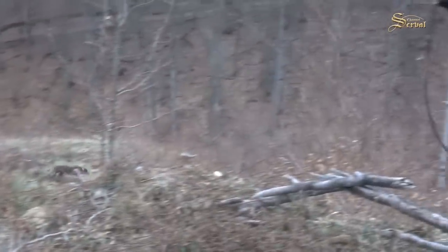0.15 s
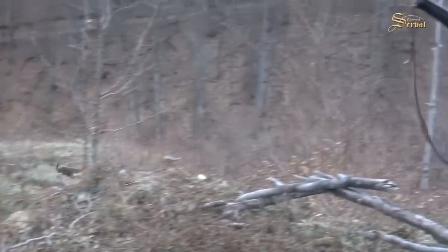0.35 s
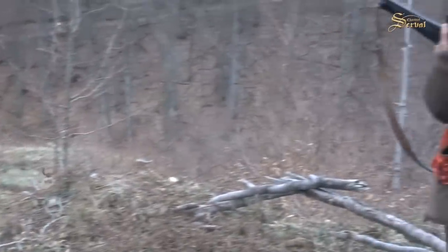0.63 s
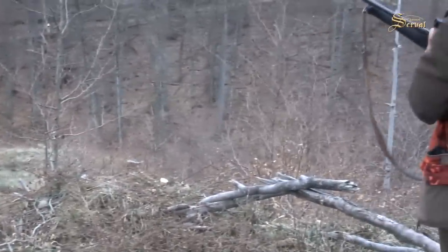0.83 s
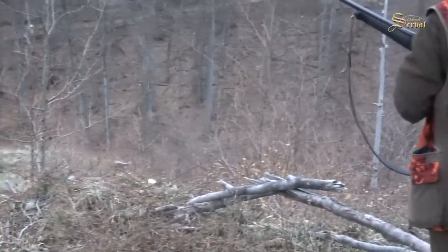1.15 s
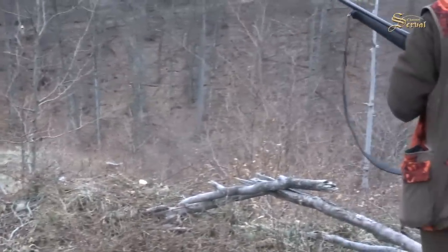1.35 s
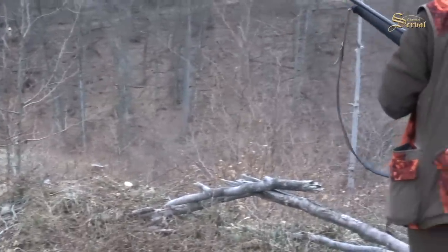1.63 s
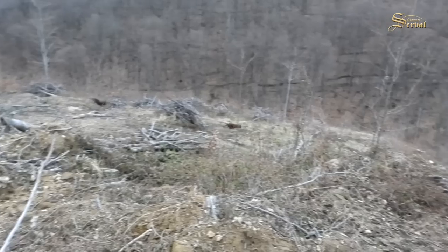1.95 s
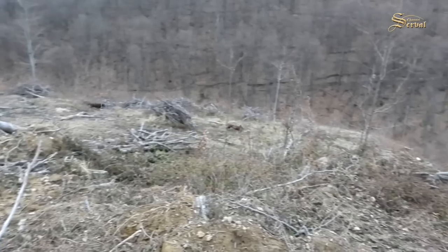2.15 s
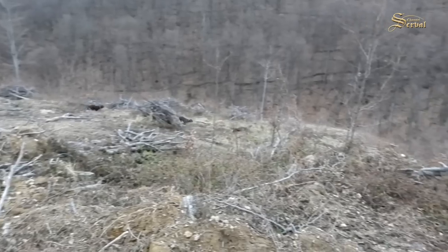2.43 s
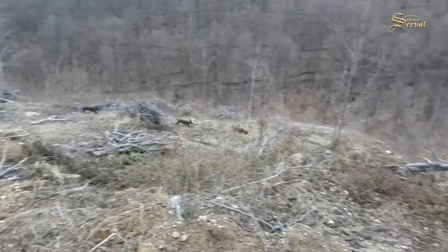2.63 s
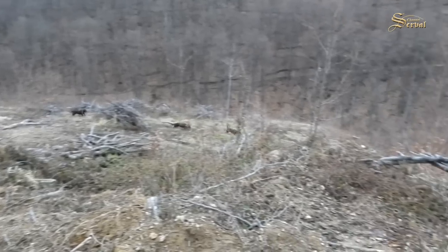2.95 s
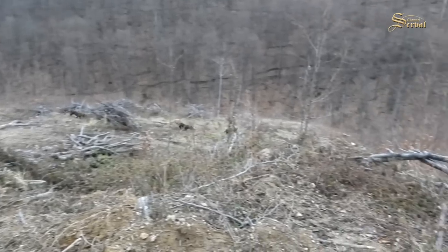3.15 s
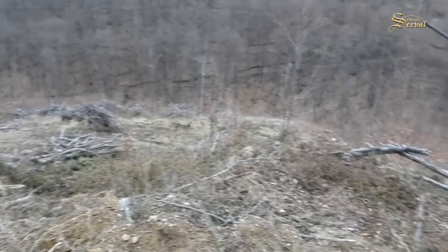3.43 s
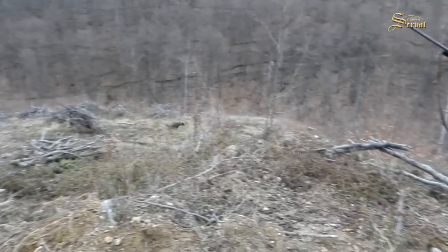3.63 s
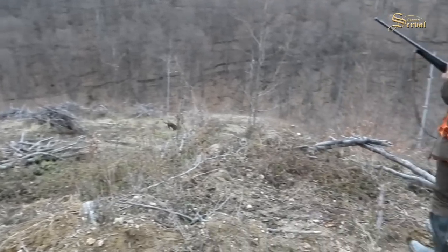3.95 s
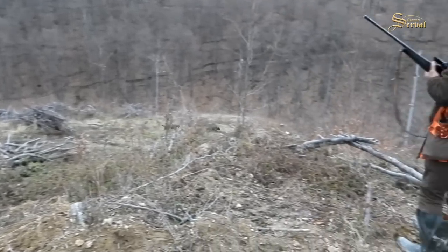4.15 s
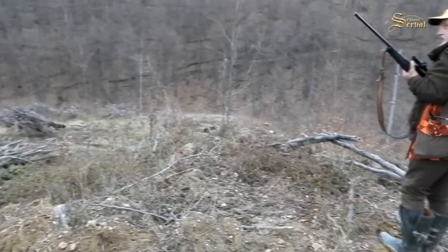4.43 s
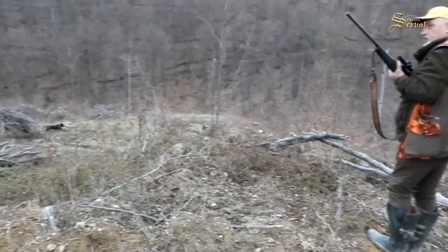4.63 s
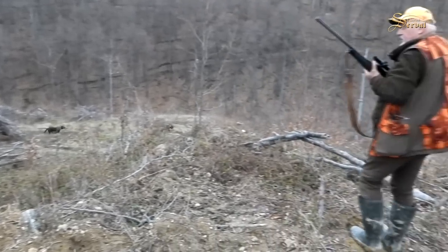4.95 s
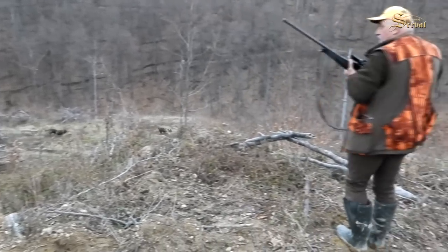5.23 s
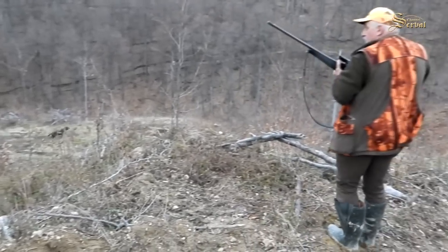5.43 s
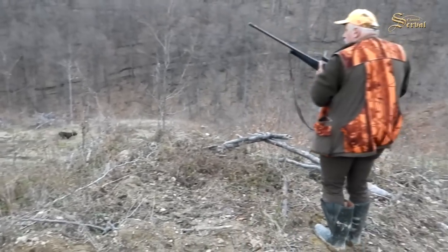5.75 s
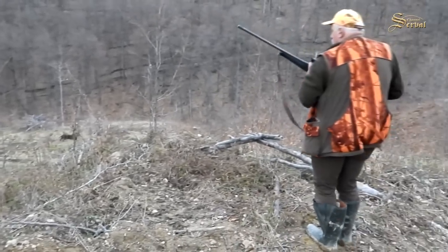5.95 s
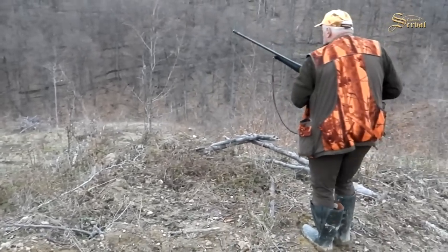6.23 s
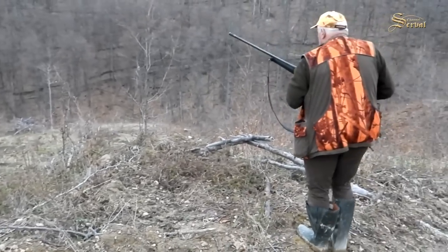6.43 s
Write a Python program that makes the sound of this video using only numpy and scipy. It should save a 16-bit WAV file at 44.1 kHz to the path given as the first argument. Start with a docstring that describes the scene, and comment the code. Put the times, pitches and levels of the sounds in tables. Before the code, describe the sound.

Hunting dogs give short, high-pitched yelps across a windy forest clearing, echoing off trees, with faint rustling, thin whistles and wind buffeting the microphone.

```python
"""Windy clearing ringed by forest; a pack of dogs yelps while running through brush.
From the start: pack yelps (partials plus breath noise), a far whistle, then a hound's falling yelp, repeated.
Throughout: thin whistles (dogs' noses, perhaps a bird: wavering sines) and twig snaps (noise bursts) among
the yelps; warbles near 0.9 s and at the end. Brush and trees scatter the yelps (sparse echoes).
Beneath: wind on two microphone ports, rumble and a faint rustling background (shaped noise)."""
import sys
import numpy as np
from scipy import signal
from scipy.fft import rfft, irfft
from scipy.io import wavfile
from scipy.ndimage import uniform_filter1d

SR = 44100
rng = np.random.default_rng(int(sys.argv[2]) if len(sys.argv) > 2 else 0)


def wrap_up_sound(samples):
    """Save the sound to the file named by the first command line argument, as 16-bit audio."""
    columns = np.atleast_2d(samples).T
    # keep every value between -1 and 1, then stretch to whole-number steps
    tamed = np.clip(columns, -1, 1)
    steps = np.round(tamed * 32767).astype(np.int16)
    wavfile.write(sys.argv[1], SR, steps)


N = 291060

# Pack yelps: (hoarseness, breath/dB, overtones/dB at start, middle, end, partial 3/dB, partial 4/dB,
# partials 5-9/dB), course [t/s, f/Hz, level/dB of partials 1-4 together]
PACK_YELPS = [ ((0.4, -19, -21.5, -23, -35, 21.5, 28, -50), [(0, 1825, -19.5), (.02, 1735, -20),
              (.045, 1424, -20), (.052, 1300, -53)]), ((0.06, 16.5, 5, 13.5, 3.5, -25, -25, -50),
              [(.004, 1074, -30.5), (.022, 1150, -30), (.055, 1146, -29), (.092, 1120, -39.5)]),
              ((.03, 1, -8, -20, -35, 4, 8, -38), [(.603, 777, -24), (.63, 1155, -22), (.66, 1382, -9),
              (.678, 1306, -5.5), (.69, 1290, -13), (.71, 1130, -14), (.736, 793, -22), (.752, 610, -34)]),
              ((.1, -5, -10, 3, 12, -30, -30, -42.5), [(.678, 777, -16), (.7, 761, -8.5), (.712, 700, -9),
              (.724, 640, -5), (.733, 560, -16)]), ((0.24, 6.5, -8, 2.5, -27, 10.5, 10.5, -50),
              [(1.328, 808, -39.5), (1.355, 1325, -14.5), (1.377, 1362, -16.5), (1.4, 1284, -12),
              (1.415, 1400, -32), (1.43, 1232, -10), (1.457, 1060, -34.5)]),
              ((0.04, -13, -29.5, -24.5, -20, 9, 14, -29.5), [(1.388, 771, -21), (1.41, 747, -6),
              (1.435, 679, -14), (1.452, 624, -21.5)]), ((.3, 2, 10, 14, 14, -11, -19, -50.5),
              [(1.425, 803, -21), (1.442, 804, -22.5), (1.46, 910, -16.5), (1.488, 886, -18.5),
              (1.493, 763, -17), (1.512, 703, -32.5)]), ((.02, 2, -10, -5, 10, 3, -10, -48),
              [(1.713, 1930, -24), (1.725, 1960, -15), (1.74, 2000, -19), (1.76, 2036, -32)]),
              ((.02, -9, -15, -25, -10, 0, 8, -50), [(1.778, 765, -36.5), (1.8, 1115, -17.5),
              (1.823, 1191, -8.5), (1.845, 1217, -10.5), (1.86, 1420, -28), (1.875, 1334, -15.5),
              (1.902, 868, -22)]), ((0.43, -7, -2, 9.5, 7.5, -10, -21.5, -59), [(1.83, 618.5, -25),
              (1.845, 597, -11), (1.86, 716.6, -11), (1.876, 653, -17), (1.892, 602, -14)]),
              ((0, -3, -4.5, 17, 24, -6, -23, -31.5), [(1.86, 688, -24.5), (1.875, 677, -12.5),
              (1.89, 827, -14.5), (1.907, 849, -12.5), (1.925, 873, -19.5), (1.932, 750, -8.5),
              (1.957, 599, -34)]), ((-0.8, 7, -5, -19, -15, 10, 8, -52), [(2.133, 1609, -19.5),
              (2.158, 1615, -31.5), (2.175, 1605, -28), (2.197, 1230, -37)]),
              ((0.04, -8.5, 18.5, -29.5, 2.5, -6.5, -9.5, -62), [(2.345, 1555, -31), (2.375, 1639, -15),
              (2.397, 1618, -17.5), (2.417, 1542, -16), (2.437, 1123, -43)]),
              ((0.2, 10.5, -23.5, 12.5, 4.5, -9, -8, -53), [(2.83, 909, -27), (2.846, 887, -22.5),
              (2.862, 1456, -31), (2.89, 1589, -30), (2.922, 1476, -24.5)]),
              ((0.07, -1.5, -4.5, -7, -12, -3, -1, -58), [(3.225, 814, -32.5), (3.25, 1455, -23.5),
              (3.27, 1576, -19.5), (3.297, 1624, -21.5), (3.315, 1504, -18.5), (3.337, 1143, -21.5)]),
              ((-0.36, 14, -9, -17, -18.5, 16.5, -8.5, -55), [(3.718, 930, -32.5), (3.733, 1010, -35),
              (3.747, 944, -28)]), ((0.08, -19, 10, 10.5, -18.5, -4, -19, -32), [(3.73, 694, -29),
              (3.745, 730, -27.5), (3.76, 847, -23.5), (3.78, 848, -21.5), (3.82, 898, -22.5),
              (3.832, 666, -33)]), ((0.15, -3.5, 2, -17.5, -4, -15, -1, -63), [(4.878, 1315, -28),
              (4.92, 1225, -10.5), (4.945, 1191, -16), (4.962, 1267, -15.5), (4.977, 954, -35)]),
              ((0.1, -2, -1, 3, 18, -6.5, -6.5, -31.5), [(5.268, 403, -56), (5.292, 579, -27),
              (5.33, 567, -26), (5.36, 570, -37), (5.385, 286, -37)]), ]
# Vocal tract response: f/Hz, level/dB
THROAT = [(400, -21), (700, 0.5), (1200, 2.5), (1800, 1), (2600, -8.5), (4000, -24.5), (5500, -22),
          (8000, -31)]
# Hound yelps: t/s, hold/s, drop/s, f/Hz at start, middle, end of hold, level/dB at the same places,
# side tone/dB at start and end of hold, partials 3-4/dB
HOUND_YELPS = [(.133, 0.048, 0.019, 1350, 1350, 1270, -24.5, -28, -24, -53, -27.5, -49),
               (0.589, .045, .02, 1430, 1392, 1270, -26.5, -27, -28.5, -37, -40.5, -24.5),
               (2.527, 0.05, 0.022, 1584, 1342, 1301, -10.5, -9.5, -12, -26.5, -55, -30.5),
               (2.913, 0.054, 0.025, 1460, 1364, 1292, -15, -24.5, -14.5, -44, -36.5, -20.5),
               (3.317, 0.051, 0.015, 1524, 1408, 1332, -20, -16.5, -15.5, -35, -33, -25),
               (3.807, 0.035, 0.032, 1435, 1400, 1299, -27, -29.5, -18.5, -55, -28.5, -40),
               (4.246, .039, 0.027, 1553, 1438, 1419, -14, -15, -13.5, -26, -34, -35),
               (4.548, .051, 0.021, 1480, 1398, 1309, -20.5, -24.5, -21, -36.5, -41, -31.5),
               (4.991, .047, 0.039, 1408, 1389, 1290, -24.5, -26, -22, -49, -26, -18),
               (5.404, 0.05, 0.028, 1351, 1368, 1246, -18, -23.5, -18.5, -38, -28.5, -37),
               (5.862, .039, 0.029, 1448, 1408, 1305, -19.5, -15.5, -16.5, -42, -31.5, -28)]
HOUND_HOARSENESS, SIDE_TONE_HZ = 0.06, 1847
SIDE_MIDDLE_DB, SIDE_STEP_DB = -4.5, -11  # mid-hold offset; fade per stage of the drop
SECOND_HELD_DB, SECOND_DROP_DB = -44.5, -13  # partial 2 against 1: in the hold, at the end of the drop
DROP_HZ_PER_S, DROP_DB_PER_S, DROP_STEP_DB = 21000, 549.5, -0.5
# Rough lines between partials where a voice breaks: t/s, length/s, first f/Hz, last f/Hz, mid level/dB
VOICE_BREAKS = [(.678, 0.04, 1913, 1805, -21.5), (1.387, 0.087, 2030, 1783, -24.5),
                (1.753, .02, 1360, 1315, -30.5), (2.132, 0.056, 1816, 1795, -33.5),
                (4.863, .015, 1930, 2400, -46), (4.914, 0.05, 1914, 1850, -29),
                (4.922, 0.064, 682, 642, -32.5)]
BREAK_ENDS_DB = -11.5
# Breath noise spectrum: f/Hz, relative level/dB per Hz
BREATH_SPECTRUM = [(500, -48.5), (1000, 3.5), (1900, 0), (2600, -2.5), (3400, -5), (4200, -5.5),
                   (5000, -1.5), (5800, -4), (8000, -5.5), (11000, -25.5), (16000, -72.5)]
BREATH_DB = -24  # against the voice

# Short whistles: t/s, length/s, first f/Hz, middle f/Hz, last f/Hz, mid level/dB
WHISTLES = [(0.463, 0.088, 4930, 5170, 5500, -48), (.59, 0.022, 6140, 6260, 6380, -46),
            (1.297, 0.042, 6230, 6200, 6900, -34), (1.655, .025, 6100, 6500, 6800, -41.5),
            (1.758, 0.072, 4100, 4400, 4510, -41.5), (2.066, 0.056, 5500, 6160, 5700, -32),
            (2.472, 0.034, 5940, 6330, 6200, -36), (2.599, 0.043, 4070, 4330, 4480, -40.5),
            (2.857, .035, 5400, 6650, 5900, -23.5), (3.253, 0.043, 5400, 6050, 6260, -32.5),
            (4.192, 0.019, 6020, 6110, 6260, -47), (4.629, 0.023, 4050, 4270, 4400, -54),
            (4.921, 0.044, 5170, 6250, 5570, -40.5), (5.044, 0.057, 4070, 4240, 4200, -48),
            (5.343, 0.029, 5960, 6070, 6300, -49), (5.494, 0.02, 4180, 4340, 4500, -53),
            (5.941, .022, 4260, 4290, 4440, -43.5)]
WHISTLE_ENDS_DB = -16.5
# Warbles, perhaps a bird, one course each: t/s, f/Hz, level/dB
WARBLES = [
    [(.903, 4980, -59), (.94, 6080, -43), (.955, 5700, -52), (.968, 4580, -36), (.98, 4450, -39),
     (1.004, 4770, -43), (1.015, 4450, -47), (1.035, 4600, -51)],
    [(.957, 5570, -49), (.985, 5860, -54), (1.015, 4800, -48), (1.036, 4900, -46)],
    [(6.23, 5650, -46), (6.26, 5850, -50), (6.297, 4770, -37.5), (6.32, 5050, -56)],
]
# Faint fuzzy whistle in the distance: t/s, f/Hz, level/dB
FAR_WHISTLE = [(.08, 4340, -47), (.2, 4470, -65), (.35, 4450, -54.5), (.46, 4620, -57)]

BRUSH_DB, BRUSH_T60_S = -11, 0.09  # near scatter off logs and brush
# Level of the voice sent to the forest echo: t/s, level/dB
REACH = [(0, -5), (.7, -10.5), (1.4, -4), (1.9, -6.5), (2.5, -6.5), (3.304, -2), (3.801, 1.5), (4.3, -6),
         (4.899, -5.5), (5.398, -4), (5.9, -1.5)]
# Colour of the voice sent to the forest echo: f/Hz, level/dB
FOREST_COLOUR = [(400, -13.5), (1200, -14), (1550, -11.5), (1850, -11), (2200, -11), (2700, -13.5),
                 (4000, -15.5), (8000, -15.5)]
# Decay of the forest tail: f/Hz, t60/s
FOREST_DECAY = [(500, 1.2), (1300, 1.67), (2600, 4.1), (5000, 0.95), (10000, 0.63)]
FOREST_DB, FOREST_DELAY_S = -22, 0.017

# Wind on the ports, before random lulls: t/s, level/dB
WIND_LEVEL = [(0.0, -18), (0.03, -39), (0.11, -22), (0.16, -32.5), (0.31, -24), (0.59, -31.5), (0.62, -23),
              (0.79, -27.5), (1.17, -25.5), (1.25, -37), (1.38, -26), (1.47, -40), (1.69, -28.5),
              (1.78, -45.5), (1.87, -32), (1.91, -33), (1.93, -33.5), (2.11, -20), (2.2, -39), (2.59, -15),
              (2.83, -32.5), (3.07, -33.5), (3.14, -43.5), (3.25, -29.5), (3.29, -39.5), (3.55, -42.5),
              (3.6, -36.5), (3.82, -48.5), (3.93, -31), (4.03, -58), (4.06, -34), (4.17, -41),
              (4.28, -22.5), (4.34, -37), (4.36, -24.5), (4.47, -26.5), (4.5, -44), (4.56, -20),
              (4.63, -31.5), (4.87, -25.5), (4.94, -42), (5.11, -28.5), (5.26, -21), (5.29, -33.5),
              (5.37, -29), (5.4, -61), (5.46, -29.5), (5.53, -39.5), (5.57, -64), (5.62, -27.5),
              (5.7, -32.5), (5.73, -22.5), (5.77, -55.5), (5.96, -45.5), (6.03, -38.5), (6.07, -48),
              (6.12, -29), (6.3, -53.5), (6.42, -46), (6.6, -46)]
# Gust spectrum: f/Hz, relative level/dB per Hz
GUST_SPECTRUM = [(24, -64.5), (40, -39.5), (91, -28.5), (199, -1), (316, -0.5), (358, -3), (418, -7),
                 (596, -15), (644, -14.5), (1600, -35), (2080, -57), (3520, -120)]
# Flutter spectrum: f/Hz, relative level/dB per Hz
FLUTTER_SPECTRUM = [(200, -32.5), (400, 3), (600, -1.5), (900, -17), (1400, -29.5), (2500, -52.5),
                    (6000, -110)]
# Balance against the gusts: t/s, lowest part of the wind/dB, flutter/dB
WIND_BALANCE = [(0, 4.5, 1), (1, 1.5, -5.5), (1.7, 7, 4), (2.498, -7.5, -11.5), (3.3, 8, -7.5),
                (4, 8, -13.5), (4.699, -2, 4), (5.4, -11.5, -3), (5.9, 5, 11), (6.6, 9, -32)]
LULLS_DB, LULLS_HZ = 1.5, 13  # rms and rate of the random rise and fall
# Single buffets, before colouring: t/s, level/dB, left minus right/dB
BUFFETS = [(0.213, -22.5, -4.5), (0.378, -20.5, 8.5), (0.843, -18, 1.0), (1.034, -27.5, 24.5),
           (1.063, -19.5, 17.5), (1.375, -32.5, -12), (1.627, -21.5, 6), (1.932, -29.5, 13),
           (1.965, -16, -3.5), (1.997, -12, -0.5), (2.304, -18, 10), (2.365, -23, -4), (2.764, -17.5, -13),
           (3.474, -24, -6), (4.063, -12.5, 1.5), (4.36, -23.5, 10.5), (4.414, -16, 8),
           (4.538, -24.5, -17.5), (4.689, -15, -0.5), (4.756, -16, 5), (4.796, -18.5, -12),
           (5.115, -15, 11.5), (5.356, -19, -2), (5.506, -24.5, -16.5), (5.626, -29.5, 12.5),
           (6.104, -30.5, 17)]
# Deep rumble of the wind: t/s, level/dB
RUMBLE_LEVEL = [(0, -40), (.5, -47), (1.2, -45), (1.3, -52), (1.541, -38.5), (1.71, -39.5), (1.78, -61),
                (2.11, -51), (2.319, -61), (2.46, -43.5), (3, -66), (3.841, -67), (3.95, -58), (4.37, -59),
                (4.45, -64), (4.9, -69), (5.09, -45.5), (5.55, -64), (6.6, -63)]
# Rumble spectrum: f/Hz, relative level/dB per Hz
RUMBLE_SPECTRUM = [(15, -29), (30, -17), (60, 2), (100, 5), (150, 18), (230, -27), (600, -69), (3000, -120)]

# Short noise bursts: twig snaps, and a bright breathy burst at 2.125 s:
# t/s, relative level/dB, centre f/Hz, top of the band/dB
SHORT_BURSTS = [(0.4845, -34.5, 1500, -40), (1.037, -34, 4000, -40), (2.125, -25, 7100, -8),
                (2.3054, -30, 4490, -47), (2.715, -21.5, 4430, -48), (3.5094, -31.5, 5500, -48),
                (3.5687, -34.5, 6080, -13), (4.2915, -41, 6000, -10), (4.468, -34.5, 3960, -29),
                (5.238, -32.5, 4970, -9), (5.309, -42, 5040, -35), (6.105, -35.5, 4040, -1)]

# Background of the woods: faint rustle, with a hollow emphasis near 1.3 kHz: f/Hz, relative level/dB per Hz
BACKGROUND_SPECTRUM = [(350, -25.5), (600, -18.5), (1040, -12.5), (1310, -7), (1410, -10.5), (1570, -17),
                       (1850, -20), (2720, -24), (6030, -24.5), (9110, -35), (10300, -39.5), (11800, -47.5),
                       (16000, -73)]
# Background course: t/s, relative level/dB
BACKGROUND_LEVEL = [(0, -51), (1.16, -58.5), (1.95, -50), (2.15, -54), (2.6, -56), (3.1, -59), (4.2, -56.5),
                    (4.6, -63), (5.6, -58.5), (6.6, -56.5)]
# Treble tilt of the background, weighted by frequency: t/s, level/dB
BACKGROUND_AIR = [(0, 13.5), (1.3, 13), (1.65, 9), (1.8, 8), (3, -3.5), (4.2, 7.5), (5, -5.5), (6.6, -1)]
# Left-right likeness of the background, clipped to +-1: f/Hz, correlation
BACKGROUND_LIKENESS = [(60, 0.03), (240, -0.48), (950, 1), (3770, 0.19), (15000, -0.24)]

RIGHT_LAG_SAMPLES, EDGE_HZ = 2, 16000


def pack_yelp(voice, course):
    """Four partials weighted by throat and moving mouth, five faint ones above."""
    hoarseness, breath_db, *mouth_points_db, third_db, fourth_db, bright_db = voice
    s, (hz, level_db) = smooth_course(course)
    mouth_db = np.interp(np.linspace(0, 2, len(hz)), range(3), mouth_points_db)
    weights_db = np.array([
        read_log_f(THROAT, k * hz) + mouth_db * (k > 1) + db
        for k, db in zip(range(1, 5), [0, 0, third_db, fourth_db])])
    total_db = 10 * np.log10((gain_of(weights_db) ** 2).sum(0))
    partials_db = list(level_db + weights_db - total_db)
    partials_db += [level_db + bright_db - 0.37 * k for k in range(5)]
    yelp = sum(tone(hz, db, hoarseness, order=k + 1) for k, db in enumerate(partials_db))
    return s, edges(len(hz)) * yelp, breath_db


def hound_yelp(s, hold, drop, first_hz, middle_hz, held_hz, first_db, middle_db, held_db,
               early_db, late_db, bright_db):
    """Held note with an unrelated side tone, then a fast drop in which partial 2 comes up."""
    end_db = held_db - DROP_DB_PER_S * drop
    side_middle_db = max(early_db, late_db) + SIDE_MIDDLE_DB
    third_db = (2 * held_db + end_db) / 3 + DROP_STEP_DB  # a third into the drop
    s, (hz, db, second_db, side_db) = smooth_course([
        (s, first_hz, first_db, SECOND_HELD_DB, early_db),
        (s + hold / 2, middle_hz, middle_db, SECOND_HELD_DB, side_middle_db),
        (s + hold, held_hz, held_db, SECOND_HELD_DB, late_db),
        (s + hold + drop / 3, held_hz - DROP_HZ_PER_S * drop / 3, third_db,
         2.44 * SECOND_DROP_DB, late_db + SIDE_STEP_DB),
        (s + hold + drop, held_hz - DROP_HZ_PER_S * drop, end_db,
         SECOND_DROP_DB, late_db + 2 * SIDE_STEP_DB)])
    upper_db = db + bright_db - 300 * np.arange(len(hz)) / SR  # fades 300 dB/s faster
    partials_db = [db, db + second_db, upper_db, upper_db - 5]
    folds = sum(tone(hz, d, HOUND_HOARSENESS, order=k + 1) for k, d in enumerate(partials_db))
    side = tone(SIDE_TONE_HZ + 0 * hz, side_db, 0.63)
    return s, edges(len(hz), rise_s=0.0024) * (folds + side), 0


def voice_breaks(voice):
    """Adds rough single lines, gliding and swelling, to the voice."""
    for s, length, first_hz, last_hz, db in VOICE_BREAKS:
        hz = bend(length, first_hz, (first_hz + last_hz) / 2, last_hz)
        level_db = db + bend(length, BREAK_ENDS_DB, 0, BREAK_ENDS_DB)
        add_at(voice, s, edges(len(hz)) * tone(hz, level_db, 0.25))


def dogs():
    """Sums all yelps and breaks; breath effort follows the yelps alone."""
    voice, effort = np.zeros((2, N))
    yelps = [pack_yelp(*row) for row in PACK_YELPS] + [hound_yelp(*row) for row in HOUND_YELPS]
    for s, yelp, breath_db in yelps:
        add_at(voice, s, yelp)
        add_at(effort, s, gain_of(breath_db) * loudness(yelp))
    voice_breaks(voice)
    return voice, breath(effort)


def loudness(x):
    """Breath grows slightly more slowly than the voice."""
    return abs(uniform_filter1d(x ** 2, 500, mode="constant")) ** 0.48


def breath(effort):
    """Ragged noise that builds up and lingers after the voice, partly different in the ports."""
    effort = signal.lfilter([.0015], [1, -.9985], effort)  # about 15 ms
    a, b = rng.standard_normal((2, N))
    noise = colour(np.array([a + 0.24 * b, a - 0.76 * b]), BREATH_SPECTRUM)
    return gain_of(BREATH_DB) * effort * evened(patchy(noise, depth_db=4.5))


def whistles():
    """Thin sines of wavering pitch: short whistles, warbles and the far whistle."""
    thin = np.zeros(N)
    calls = [smooth_course(rows) for rows in WARBLES]
    for s, length, *hz, db in WHISTLES:
        level_db = db + bend(length, WHISTLE_ENDS_DB, 0, WHISTLE_ENDS_DB)
        calls.append((s, (bend(length, *hz), level_db)))
    for s, (hz, db) in calls:
        add_at(thin, s, edges(len(hz)) * tone(hz + 70 * wobble(len(hz), 150), db, 0.22))
    s, (hz, db) = smooth_course(FAR_WHISTLE)
    add_at(thin, s, tone(hz + 120 * wobble(len(hz), 150), db, 0.36))
    return thin


def brush(x):
    """Short cloud of sparse echoes that grains each yelp and trails it."""
    t = np.arange(SR // 6) / SR
    shape = (2, len(t))
    taps = rng.standard_normal(shape) * (rng.random(shape) < .02)
    taps *= gain_of(-60 * t / BRUSH_T60_S) * (t > .003)
    taps[1] = 0.77 * taps[0] + .5 * taps[1]
    return signal.fftconvolve(x[None], taps / np.linalg.norm(taps[0]), axes=1)[:, :N]


def forest(x):
    """Sparse echoes off trunks, building up from the tree line, each band dying at its own speed."""
    taps = np.zeros((2, 2 * SR))
    at = np.arange(0, 2 * SR - 20, 20) + rng.integers(0, 20, (2, SR // 10 - 1))
    np.put_along_axis(taps, at, rng.choice([-1., 1.], at.shape), 1)
    taps[1] = 1.13 * taps[0] + 0.4 * taps[1]
    hz, t, z = signal.stft(taps, SR, nperseg=256)
    rise = np.clip(t / FOREST_DELAY_S - 1, 0, 1) * np.clip(t / 0.034, 0, 1)
    decay = gain_of(-60 * t / read_log_f(FOREST_DECAY, hz)[:, None])
    tail = signal.istft(z * rise * decay, SR, nperseg=256)[1]
    tail *= np.sqrt(12.0) / np.linalg.norm(tail[0])
    return signal.fftconvolve(x[None], tail, axes=1)[:, :N]


def wind():
    """Lumpy low noise, unrelated in the two ports, plus a brighter flutter with sharper lumps."""
    t = np.arange(N) / SR
    lumps = gain_of(np.minimum(4.1 * wobble((2, N), 70) + 1.35 * wobble(N, 23.3), 9))
    gusts = evened(colour(lumps * rng.standard_normal((2, N)), GUST_SPECTRUM))
    flutter = evened(colour(lumps ** 2.53 * rng.standard_normal((2, N)), FLUTTER_SPECTRUM))
    level_db = np.interp(t, *np.transpose(WIND_LEVEL)) + LULLS_DB * wobble(N, LULLS_HZ)
    s, *balance = np.transpose(WIND_BALANCE)
    low_db, flutter_db = (np.interp(t, s, db) for db in balance)
    gusts = gusts + (gain_of(low_db) - 1) * colour(gusts, [(170, -0.5), (260, -9.0)])
    # flutter grows faster than the gusts
    return gusts * gain_of(level_db) + flutter * gain_of(1.034 * level_db - 5.0 + flutter_db)


def buffets():
    """Single decaying puffs of a few cycles, 230-450 Hz, each port with its own pitch and phase."""
    t, puffs = np.arange(900) / SR, np.zeros((2, N))
    for (s, db, pan_db), luck in zip(BUFFETS, rng.random((len(BUFFETS), 4))):
        hz, phase_turns = 230 + 220 * luck[:2, None], luck[2:, None]
        puff = np.sin(2 * np.pi * (hz * t + phase_turns)) * t / 0.0038 * np.exp(1 - t / 0.0039)
        add_at(puffs, s, gain_of(db + np.array([[.5], [-.5]]) * pan_db) * puff)
    # keeps the puffs free of deep bass and treble
    return colour(puffs, [(40, -26.5), (180, 0.5), (900, -5.0), (3000, -54)])


def rumble():
    """Deep noise of the wind, mostly shared by the ports."""
    a, b = rng.standard_normal((2, N))
    deep = evened(colour(np.array([a + 0.2 * b, a - 0.13 * b]), RUMBLE_SPECTRUM))
    return deep * gain_of(np.interp(np.arange(N) / SR, *np.transpose(RUMBLE_LEVEL)))


def short_bursts():
    """Twig snaps and one breathy burst: fast-decaying noise, each around its own centre."""
    out, t = np.zeros((2, N)), np.arange(700) / SR
    draws = rng.standard_normal((len(SHORT_BURSTS), 2, 700))
    for (s, db, hz, top_db), (a, b) in zip(SHORT_BURSTS, draws):
        band = [(hz / 8, -10), (hz, 0), (9500, -8), (15000, top_db)]
        burst = evened(colour(np.array([a + .5 * b, a - .5 * b]), band))
        envelope = gain_of(db - 7.5 - 60 * t / 0.032) * np.clip(t / 0.0019, 0, 1)
        add_at(out, s, envelope * burst)
    return out


def background():
    """Random short-time spectra with drifting patches and frequency-dependent stereo likeness."""
    frames, hz = N // 128 + 5, np.fft.rfftfreq(512, 1 / SR)
    t = np.arange(frames) * 128 / SR
    a, b, c, d, patches = rng.standard_normal((frames, 257, 5)).T
    patches_db = 1.6 * evened(uniform_filter1d(uniform_filter1d(patches, 8, 0), 20, 1))
    # tilt sets in at 7 kHz, full from 13.5 kHz
    air_db = np.clip(hz / 5000 - 1.4, 0, 1.3)[:, None] * np.interp(t, *np.transpose(BACKGROUND_AIR))
    same = np.clip(read_log_f(BACKGROUND_LIKENESS, hz), -1, 1)[:, None]
    left = a + 1j * b
    z = np.array([left, same * left + np.sqrt(1 - same ** 2) * (c + 1j * d)])
    level_db = np.interp(t, *np.transpose(BACKGROUND_LEVEL)) + 65.5
    z *= gain_of(read_log_f(BACKGROUND_SPECTRUM, hz)[:, None] + patches_db + air_db + level_db)
    return signal.istft(z / 512, nperseg=512, noverlap=384)[1][:, :N]


def tone(hz, db, hoarseness, order=1):
    """One partial at rms level db; hoarse folds shake its phase and size."""
    shake = hoarseness + 0.022 * max(order - 2, 0) + 0.02 * (order - 1)
    phase = order * 2 * np.pi * np.cumsum(hz) / SR + 0.42 * shake * wobble(len(hz), 520)
    size = 1 + np.tanh(3.3 * shake * wobble(len(hz), 110))  # breaks up, never more than doubles
    return np.sqrt(2) * gain_of(db) * size * np.sin(phase)


def edges(n, rise_s=0.0017):
    """Linear onset and short linear end."""
    t = np.arange(n) / SR
    return np.clip(t / rise_s, 0, 1) * np.clip(t[::-1] / 0.0027, 0, 1)


def bend(length, first, middle, last):
    """Parabola through three values over length seconds."""
    u = np.arange(0, length, 1 / SR) / length
    return first * (1 - u) * (1 - 2 * u) + 4 * middle * u * (1 - u) + last * u * (2 * u - 1)


def smooth_course(rows):
    """Start time, and the columns at every sample with corners rounded."""
    s, *columns = np.transpose(rows)
    t = np.arange(s[0], s[-1], 1 / SR)
    return s[0], [uniform_filter1d(np.interp(t, s, c), 200, mode="nearest") for c in columns]


def wobble(shape, hz):
    """Smooth noise of rms 1 that changes about hz times a second."""
    width = max(round(SR / hz / 2), 1)
    return evened(uniform_filter1d(uniform_filter1d(rng.standard_normal(shape), width), width))


def patchy(x, depth_db):
    """Multiplies short-time spectra by random patches, the same for all channels."""
    z = signal.stft(x, nperseg=256, noverlap=192)[2]
    patches = uniform_filter1d(uniform_filter1d(rng.standard_normal(z.shape[-2:]), 3, 0), 12, 1)
    z = z * gain_of(depth_db * evened(patches))
    return signal.istft(z, nperseg=256, noverlap=192)[1][..., :N]


def colour(x, points):
    """Filters along the last axis by a spectrum in dB."""
    n = x.shape[-1]
    return irfft(rfft(x) * gain_of(read_log_f(points, np.fft.rfftfreq(n, 1 / SR))), n)


def read_log_f(points, hz):
    """Interpolates a table over log frequency."""
    f, value = np.transpose(points)
    return np.interp(np.log(hz + 1), np.log(f + 1), value)


def gain_of(db):
    """Amplitude factor of a level in dB."""
    return 10 ** (np.asarray(db) / 20)


def evened(x):
    """Scales to rms 1 over all channels."""
    return x / np.sqrt(np.mean(x ** 2) + 1e-20)


def add_at(mix, s, sound):
    """Adds a sound at s seconds, cut at the end of the mix."""
    part = mix[..., round(s * SR):][..., :sound.shape[-1]]
    part += sound[..., :part.shape[-1]]


def scene():
    """Near dogs and whistles, forest tail, wind, short bursts, background."""
    voice, breath_noise = dogs()
    near = voice + (whistles() + breath_noise) * gain_of([[.8], [-.8]])
    near += gain_of(BRUSH_DB) * brush(voice)
    near[1] = np.roll(near[1], RIGHT_LAG_SAMPLES)  # the pack is slightly to the left
    reach_db = np.interp(np.arange(N) / SR, *np.transpose(REACH))
    far = colour(voice * gain_of(reach_db), FOREST_COLOUR)
    dogs_in_forest = near + gain_of(FOREST_DB) * forest(far)
    return dogs_in_forest + wind() + buffets() + rumble() + short_bursts() + background()


def record(dry):
    """Clips at full scale, then low-passes at EDGE_HZ."""
    low_pass = signal.firwin(511, EDGE_HZ, window=("kaiser", 9), fs=SR)
    return signal.oaconvolve(np.clip(dry, -1, 1), low_pass[None], "same")


dry = scene()
out = record(dry)
wrap_up_sound(out)
```